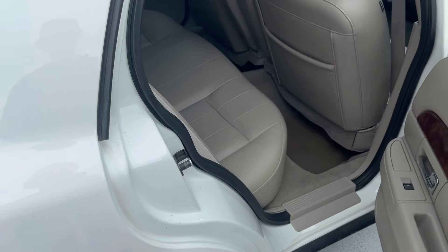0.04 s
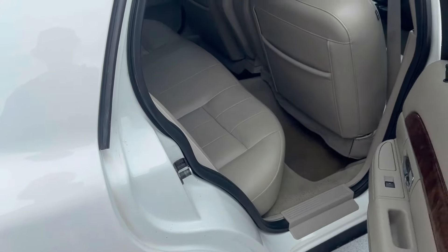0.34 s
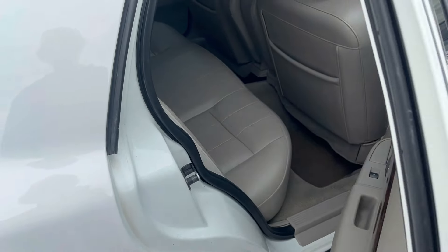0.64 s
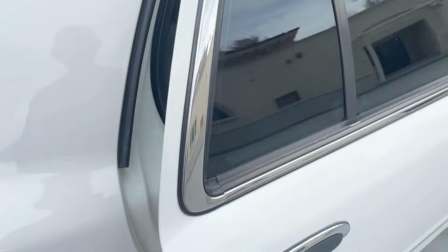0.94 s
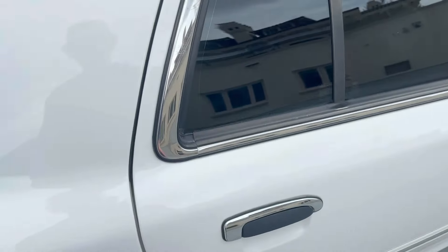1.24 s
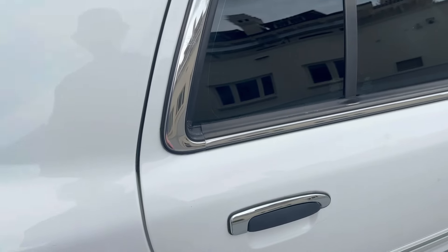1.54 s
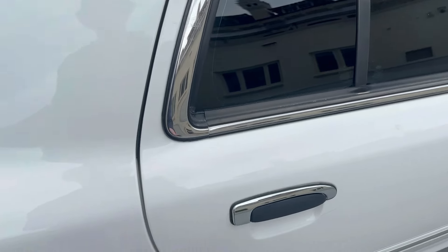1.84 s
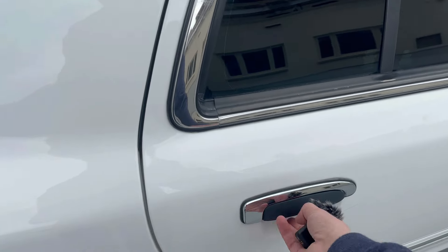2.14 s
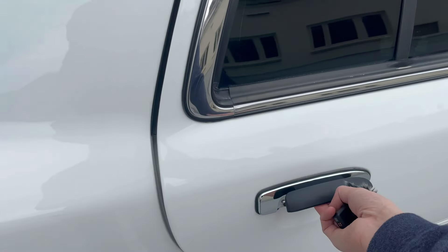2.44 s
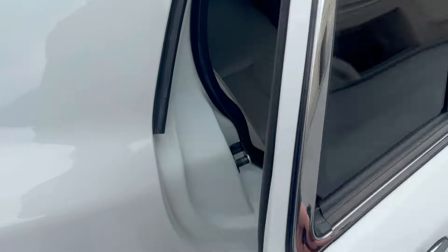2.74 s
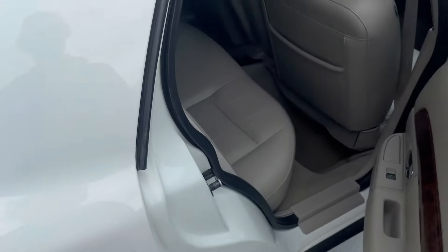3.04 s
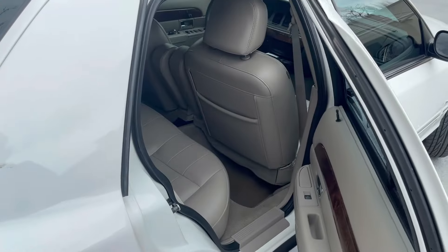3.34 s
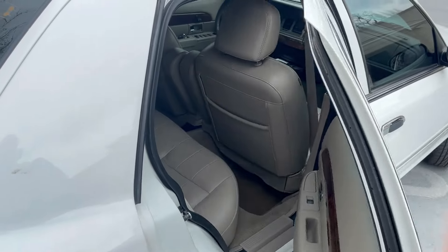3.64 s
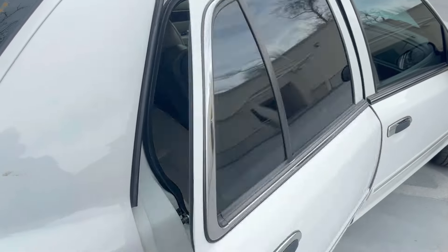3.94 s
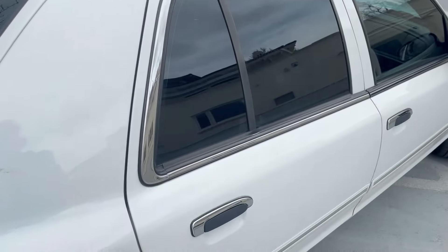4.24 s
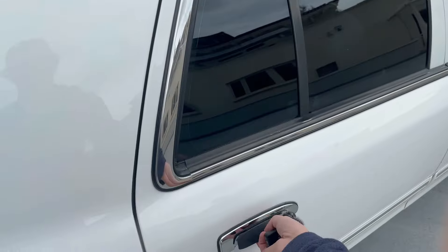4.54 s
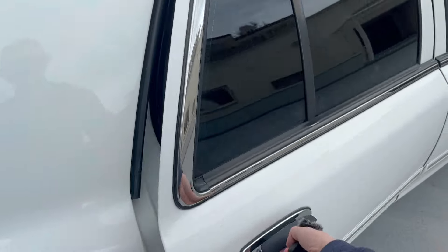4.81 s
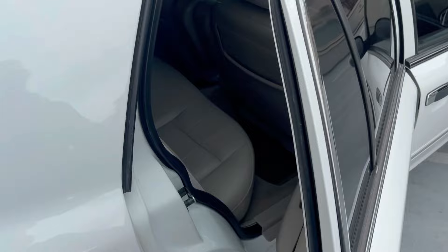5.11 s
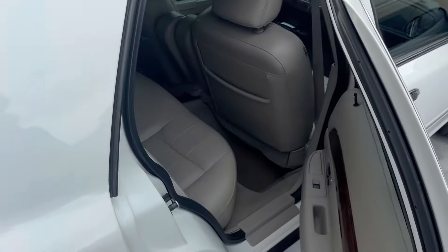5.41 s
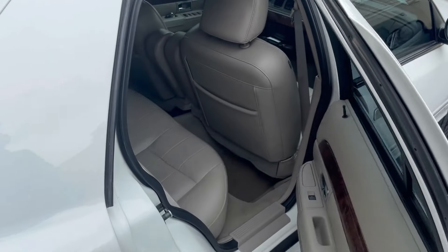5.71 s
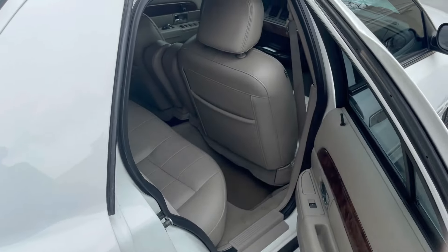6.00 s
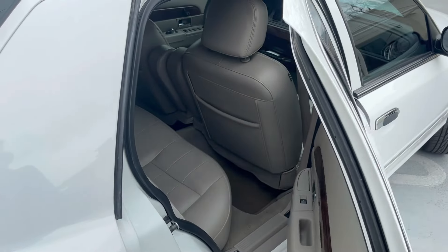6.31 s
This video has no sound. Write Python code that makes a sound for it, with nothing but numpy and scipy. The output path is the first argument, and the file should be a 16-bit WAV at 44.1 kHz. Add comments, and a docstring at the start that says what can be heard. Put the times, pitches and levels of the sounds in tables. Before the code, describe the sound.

Close by in a quiet street, a car door slams shut, clicks open and clunks on its hinge, then does it all again.

```python
"""A parked saloon's heavy rear door, at arm's length in a quiet street. Over far traffic and stirring air,
sleeves rustle and the hand-held microphone is bumped. The dry hinge creaks, then the door slams: a quick
run of latch contacts, a boom of the sealed cabin, a faint echo. The handle clicks, the latch lets go and
the door clunks over its hinge check. It is slammed and opened again, the hinge scratching as it swings."""
import sys
import numpy as np
from scipy import signal
from scipy.io import wavfile
from scipy.ndimage import uniform_filter1d

SR = 44100
rng = np.random.default_rng(int(sys.argv[2]) if len(sys.argv) > 2 else 0)


def wav_record(signal):
    """Record a signal, one row per channel, as 16-bit PCM in the file named by sys.argv[1]."""
    frames = np.transpose(np.atleast_2d(signal))
    bounded = np.clip(frames, -1, 1)
    # unit amplitude maps onto the largest positive 16-bit level
    quanta = np.round(bounded * 32767).astype(np.int16)
    wavfile.write(sys.argv[1], SR, quanta)


N = 289296
TIME = np.arange(N) / SR

# Decay of the shut door. Each row: frequency in Hz, T60 in seconds.
SHUT_RING = [(60, 0.5), (250, 0.37), (700, 0.15), (2000, 0.13), (6000, 0.12), (15000, 0.096)]


def from_db(db):
    """Decibels to gain."""
    return 10 ** (np.asarray(db) / 20)


def at_hz(points, hz):
    """Read a table on a log-frequency axis."""
    freqs_hz, values = np.transpose(points)
    return np.interp(np.log(hz), np.log(freqs_hz), values)


def band_noise(colour, envelope):
    """Half-octave noise bands, each following envelope(hz); rms about 1 at envelope 1."""
    edges_hz = np.geomspace(28, 17000, 20)
    centres_hz = np.sqrt(edges_hz[1:] * edges_hz[:-1])
    gains = from_db(at_hz(colour, centres_hz))
    gains /= np.sqrt(np.sum(gains ** 2 * np.diff(edges_hz)) * 2 / SR)
    white, out = rng.standard_normal((2, N)), np.zeros(N)
    for k, hz in enumerate(centres_hz):
        band = signal.butter(2, edges_hz[k:k + 2], "band", fs=SR, output="sos")
        out += gains[k] * signal.sosfilt(band, white[k % 2] * envelope(hz))
    return out


def swells(movements, rise_share, fall_share, rest_db):
    """Gain over time: each movement speeds up, holds and slows, above a resting level."""
    power = from_db(rest_db) ** 2
    for start_s, length_s, db in movements:
        done = (TIME - start_s) / length_s
        speed = np.clip(np.minimum(done / rise_share, (1 - done) / fall_share), 0, 1)
        power = power + (from_db(db) * speed) ** 2
    return np.sqrt(power)


def grain(spread_db):
    """Gain fluttering every few milliseconds, as rough surfaces catch and slip."""
    flutter = uniform_filter1d(rng.standard_normal(N), size=100)
    return from_db(spread_db * flutter / flutter.std())


def pulses(times_s, sizes):
    """One impulse per contact."""
    out = np.full(N, 1e-18)
    np.add.at(out, np.round(times_s * SR).astype(int), sizes)
    return out


def ring(force, hz, t60_s):
    """One mode: a unit impulse starts a decaying sine of height 1."""
    r, w = from_db(-60 / (t60_s * SR)), 2 * np.pi * hz / SR
    return signal.lfilter([0, r * np.sin(w)], [1, -2 * r * np.cos(w), r * r], force)


def decay(times_s, gains, t60_s):
    """Amplitude envelope: the energy of each hit adds, then leaks away exponentially."""
    retained = from_db(-60 / (t60_s * SR)) ** 2
    energy = signal.lfilter([1], [1, -retained], pulses(times_s, gains ** 2))
    return np.sqrt(energy)


def follow(events, pattern):
    """Each event sets off the same run of contacts; delays and decibels add."""
    return [tuple(np.add(event, step)) for event in events for step in pattern]


def strengths(contacts, hz):
    """Drive of each contact at one frequency: weight adds bass, bare metal adds treble."""
    _, db, bass_db, treble_db = np.transpose(contacts)
    return from_db(db + bass_db / (1 + (hz / 350) ** 4) + treble_db / (1 + (2800 / hz) ** 3))


def clatter(contacts, colour, ring_times, crack_t60_s, crack_db, ring_db, rattle_db):
    """Modes too dense to tell apart: a short crack and a rattling ring."""
    times_s, rattle = np.array(contacts)[:, 0], grain(rattle_db)

    def envelope(hz):
        drive = strengths(contacts, hz)
        crack = from_db(crack_db) * decay(times_s, drive, crack_t60_s)
        tail = from_db(ring_db) * rattle * decay(times_s, drive, at_hz(ring_times, hz))
        return np.hypot(crack, tail)
    return band_noise(colour, envelope)


def panel(contacts, modes, scatter_db):
    """A part's strong modes: low ones start in step as one blunt push, higher ones alternate in sign."""
    times_s, out = np.array(contacts)[:, 0], np.zeros(N)
    scatter = from_db(scatter_db * rng.standard_normal((len(times_s), len(modes))))
    for k, (hz, db, t60_s) in enumerate(modes):
        sign = 1 if hz < 280 else (-1) ** k
        force = pulses(times_s, strengths(contacts, hz) * scatter[:, k])
        out += sign * from_db(db) * ring(force, hz, t60_s)
    # Below its lowest mode a part pushes air aside without radiating.
    lowest_hz = min(mode[0] for mode in modes)
    return signal.sosfilt(signal.butter(4, .7 * lowest_hz, "high", fs=SR, output="sos"), out)


def traffic():
    """Distant traffic: a low, slowly drifting rumble."""
    # Each row: time in seconds, level in dB.
    drift = [(0, -55), (.6, -53), (1.6, -56), (2.5, -54.5), (3.5, -56), (4.5, -55), (5.1, -52), (6.56, -57)]
    # Each row: frequency in Hz, density in dB.
    colour = [(15, -31), (25, -8.5), (70, -8.5), (108, 11), (149, -8.5), (190, 3.5), (270, -6), (344, -5.5),
              (818, -11), (1040, -13), (2410, -24.5), (3820, -45), (11900, -45), (16000, -46.5)]
    gain = from_db(np.interp(TIME, *np.transpose(drift)))
    return band_noise(colour, lambda hz: gain)


def microphone_rumble():
    """Over a light breeze: low rumble as the microphone is moved, then a puff of air after each slam."""
    # Each row: start in seconds, length in seconds, level in dB.
    surges = [(.27, 0.43, -50), (1.27, 0.19, -50.5), (4.28, 0.24, -50.5)]
    # Each row: frequency in Hz, density in dB.
    colour = [(30, -1.5), (80, 0), (160, -9.5), (400, -26.5), (1500, -63), (15000, -90.5)]
    gain = swells(surges, rise_share=0.053, fall_share=0.59, rest_db=-68.5)
    return band_noise(colour, lambda hz: gain)


def handling():
    """Grainy sleeve friction, dry ticks of keys and grit, dull finger bumps on the microphone."""
    # Arm movements. Each row: start in seconds, length in seconds, level in dB.
    strokes = [(.11, 0.065, -67.5), (.34, .13, -71.5), (.92, 0.19, -63), (1.6, .24, -62.5),
               (1.76, .24, -67), (1.93, 0.15, -61.5), (2.02, 0.16, -67.5), (2.25, 0.083, -65),
               (2.28, 0.45, -69), (3.22, 0.11, -70.5), (3.71, 0.083, -64.5), (3.92, 0.12, -60.5),
               (4.41, 0.22, -70.5), (5.73, 0.26, -58.5), (5.93, 0.21, -65)]
    # Each row: frequency in Hz, density in dB.
    sleeve_colour = [(300, -27.5), (1200, -3), (3000, 2.5), (5500, -0.5), (9000, -4.5), (15000, -6.5)]
    # Each row: time in seconds, relative level in dB.
    ticks = [(0.2557, -45.5), (0.3735, -42), (0.419, -42.5), (0.9469, -42), (4.414, -38), (4.7507, -29.5),
             (5.1356, -46.5), (5.429, -42.5), (6.1727, -41), (6.2168, -47)]
    bumps = [(0.289, -35.5), (0.653, -34), (4.003, -37.5), (4.567, -27.5), (5.644, -26), (5.75, -17),
             (5.919, -31)]
    rub = swells(strokes, rise_share=0.357, fall_share=0.35, rest_db=-75) * grain(spread_db=2.2)
    tick_s, tick_db = np.transpose(ticks)
    envelope = rub + decay(tick_s, from_db(tick_db - 7.5), t60_s=0.0074)
    bump_s, bump_db = np.transpose(bumps)
    thuds = ring(pulses(bump_s, from_db(bump_db)), hz=119, t60_s=0.03)
    return band_noise(sleeve_colour, lambda hz: envelope) + thuds


def dry_hinge(creak_step_s=0.0065, creak_loss_db=1.5, swing_s=(4.91, 5.10), slips_per_s=40):
    """The hinge slips: a short creak on the first closing, an uneven scratch on the last swing out."""
    # Each row: start in seconds, then level, bass and treble in dB.
    creak_start = [(.863, -47, 0, -2)]
    # Each row: frequency in Hz, level in dB, T60 in seconds.
    hinge_modes = [(1060, 2, 0.023), (1820, -9, 0.013), (2550, -8, 0.025), (3420, -4, .014)]
    # Each row: frequency in Hz, density in dB.
    slip_colour = [(100, -6), (450, 4.5), (1200, -8), (2500, -10), (4200, 0.5), (6000, 1), (8000, -12),
                   (15000, -9)]
    creak = follow(creak_start, [(k * creak_step_s, -k * creak_loss_db, 0, 0) for k in range(4)])
    slip_s = np.arange(*swing_s, 1 / slips_per_s)
    jitter, size = rng.standard_normal((len(slip_s), 2)).T
    scratch = decay(slip_s + .25 * jitter / slips_per_s, from_db(-59 + 1.5 * size), t60_s=.025)
    return band_noise(slip_colour, lambda hz: scratch) + panel(creak, hinge_modes, scatter_db=5.5)


def slams():
    """The safety catch knocks, the latch crashes home, door and cabin boom."""
    # Each row: time in seconds, then level, bass and treble in dB.
    catches = [(1.1294, -13, -0.5, 0), (4.1366, -9, 0.5, -0.5)]
    shuts = [(1.1490, -10, -1.5, -.5), (4.1520, -9, .5, 0.5)]
    # Each row: offset in seconds, then level, bass and treble in dB.
    pawl_steps = [(0, -2, -12, -3.5), (.0045, 0, -16, 2)]  # pawl hits the catch, drops in behind it
    home_steps = [(-.006, 1.5, -15.5, -6), (-.0027, 2, -10, -0.5), (0, 0, 6.5, 1.5), (0.023, -20, 2, 7.5),
                  (.058, -26, -10, -2)]  # ramp, striker and frame meet; door rebounds, trim rattles
    # Each row: frequency in Hz, density in dB.
    crash_colour = [(60, -15), (200, -5.5), (450, -1.5), (750, -1.5), (1400, -4), (2200, -9.5), (4000, -12),
                    (5500, -17), (7000, -17.5), (10000, -23), (15000, -25.5)]
    # Each row: frequency in Hz, relative level in dB, T60 in seconds.
    catch_modes = [(686, -2, 0.081), (1350, -8, .016), (1860, -12, 0.049), (2380, -12, .035)]
    shut_modes = [(57, -12.5, 0.25), (87.5, -13.5, 0.28), (104, -19.5, 0.3), (126, -17, 0.36),
                  (130.1, -7.5, 0.037), (159.6, -18, 0.26), (186, -19.5, 0.17), (253, -14, 0.18),
                  (282, -21.5, 0.2), (347, -19.5, 0.15), (459, -18, 0.26), (504, -18.5, 0.24),
                  (636, -11, 0.086), (689, -10.5, 0.042), (776, -11, 0.076), (1307, -8, 0.06),
                  (1479, -10, 0.046), (1844, -15, 0.088), (2110, -13, 0.094), (2324, -18.5, 0.12),
                  (2700, -20, 0.077), (3790, -20, 0.056), (6400, -23, 0.067)]  # door, cabin, seal and striker
    home = follow(shuts, home_steps)
    contacts = follow(catches, pawl_steps) + home
    crash = clatter(contacts, crash_colour, SHUT_RING,
                    crack_t60_s=0.02, crack_db=1.5, ring_db=-13.5, rattle_db=2.5)
    boom = from_db(-2) * panel(home, shut_modes, scatter_db=1.5)
    knock = from_db(1) * panel(catches, catch_modes, scatter_db=0.9)
    return crash + boom + knock + street_echo(contacts, echo_db=-34, t60_s=0.52, delay_s=0.059)


def street_echo(contacts, echo_db, t60_s, delay_s):
    """A hard blow scatters back, faint and dull, from the house fronts."""
    # Each row: frequency in Hz, density in dB.
    colour = [(60, -2.5), (200, 10.5), (700, -3), (2000, -9.5), (4000, -22.5), (7000, -41.5),
              (15000, -50.5)]
    arrivals_s = np.array(contacts)[:, 0] + delay_s
    return from_db(echo_db) * band_noise(colour, lambda hz: decay(arrivals_s, strengths(contacts, hz), t60_s))


def latch_and_clicks(roller_step_s=0.0033, roller_loss_db=0.5):
    """Handle, rods and hinge roller click, the door pops off its seal, fingers knock the microphone."""
    # Each row: time in seconds, then level, bass and treble in dB.
    pulls = [(2.3971, -31.5, 0.5, 0.5), (4.6116, -32.5, -1, -2)]
    lone_hits = [(2.5804, -28.5, -57, -3.5), (2.8852, -44, -1, -15), (2.9269, -43.5, 16.5, -15),
                 (2.9396, -43.5, 0, -6), (2.9586, -40.5, 6, -8.5), (3.6011, -55.5, 10, 8.5),
                 (3.655, -49, 1, -4.5), (3.729, -46, -3, -13.5), (3.9190, -44.5, -8, 0),
                 (4.8052, -34.5, -8, 4.5), (5.638, -48.5, 24.5, -0.5), (5.7510, -54.5, 22.5, 11.5),
                 (6.1307, -45.5, 8, -5)]  # hinge ticks, handle springing back, dull finger knocks on the microphone
    # Each row: offset from the pull in seconds, then level, bass and treble in dB.
    linkage_steps = [(-.017, -10.5, 5, -12), (0, -0.5, -19, -10), (0.0172, -3.5, -9, 1.5)]  # slack taken up, lever meets rod, rod lifts pawl
    release_steps = [(0, -6.5, -3, -14), (.0215, -5, 3, 2.5), (.05, -16, 6, -7), (0.0849, 8.5, -.5, -2),
                     (.12, -8, -10, -5), (.146, -5.5, -10, -23)]  # door shifts, latch lets go, seal pushes out
    # Roller grinding up to the detent. Each row: start in seconds, length in seconds, level in dB.
    ramps = [(3.001, .02, -35.5), (5.2298, .012, -31.5)]
    # Each row: frequency in Hz, density in dB.
    pop_colour = [(50, -20), (90, -9.5), (140, -6.5), (220, -8), (470, -5), (750, -10), (1100, -10.5),
                  (2200, -15.5), (5000, -25), (9000, -35), (15000, -38)]
    click_colour = [(100, 0), (400, 6.5), (800, -7), (1500, -4), (3200, -5), (4500, -10), (6000, -6.5),
                    (9000, -18.5), (15000, -19.5)]
    # Each row: frequency in Hz, T60 in seconds.
    click_ring = [(100, 0.059), (1000, 0.047), (4000, 0.062), (15000, 0.048)]
    # Each row: frequency in Hz, relative level in dB, T60 in seconds.
    door_modes = [(93, -12.5, 0.22), (131.5, -2, 0.16), (154, -9, 0.14), (449.7, -20, 0.29),
                  (737, -11, 0.068)]
    rod_modes = [(700, -10.5, 0.072), (1060, -16.5, .06), (1440, -15.5, .05), (2390, -9.5, 0.053),
                 (2640, -14, 0.1), (3120, -12.5, 0.051), (3700, -16, 0.045), (5300, -13.5, 0.02),
                 (6450, -13.5, 0.045)]
    release = follow(pulls, release_steps)
    pop = clatter(release, pop_colour, SHUT_RING,
                  crack_t60_s=0.049, crack_db=-3.5, ring_db=-8, rattle_db=2)
    pop += from_db(4) * panel(release, door_modes, scatter_db=0.5)
    roller = [(start_s + after_s, db - roller_loss_db * k, 0, 0)
              for start_s, length_s, db in ramps
              for k, after_s in enumerate(np.arange(0, length_s, roller_step_s))]
    contacts = follow(pulls, linkage_steps) + roller + lone_hits
    clicks = clatter(contacts, click_colour, click_ring,
                     crack_t60_s=0.028, crack_db=1, ring_db=-5, rattle_db=3)
    return pop + clicks + from_db(-4.5) * panel(contacts, rod_modes, scatter_db=2)


def hinge_check(low_cut_hz=129):
    """The check arm snaps over its detent and rings the free door; no sealed cabin, so no deep bass."""
    # Each row: time in seconds, then level, bass and treble in dB.
    detents = [(3.0272, -1.5, 0.5, -0.5), (5.2460, -1, 0, 2)]
    # Snap and knock back. Each row: offset in seconds, then level, bass and treble in dB.
    snap_steps = [(0, 0.5, 1, 1), (0.013, -9.5, -3, -5)]
    # Each row: frequency in Hz, density in dB.
    clunk_colour = [(40, -37), (100, -18), (200, -5.5), (550, 1.5), (950, -3.5), (1400, -3), (2600, -4),
                    (4500, -14), (7000, -21.5), (10000, -29), (15000, -28.5)]
    # Each row: frequency in Hz, T60 in seconds.
    open_ring = [(60, 0.17), (250, 0.34), (700, 0.21), (1500, 0.084), (4000, 0.059), (15000, 0.046)]
    # Hinge plate, skin and glass. Each row: frequency in Hz, relative level in dB, T60 in seconds.
    open_modes = [(600, 0, .014), (84, -24, .2), (104, -19, .23), (135, -22, .2), (156, -13, .21),
                  (242, -19, .24), (330, -20, .17), (404, -12, .16), (432, -14, .17), (487, -12, .18),
                  (565, -12, .14), (660, -12, .12), (780, -19, .11), (1080, -27, .16), (1250, -18, .1),
                  (1420, -18, .07), (1790, -21, .06), (2365, -16, .06), (2650, -19, .05), (4400, -21, .04),
                  (188, -27, .45), (974, -27.5, .29)]
    contacts, snaps = follow(detents, snap_steps), follow(detents, snap_steps[:1])
    clunk = clatter(contacts, clunk_colour, open_ring,
                    crack_t60_s=0.015, crack_db=0.5, ring_db=-13, rattle_db=1)
    door = from_db(-1) * panel(snaps, open_modes, scatter_db=2.13)
    echo = street_echo(snaps, echo_db=-40, t60_s=0.36, delay_s=0.027)
    return signal.sosfilt(signal.butter(2, low_cut_hz, "high", fs=SR, output="sos"), clunk + door + echo)


def scene():
    """The door, the person at the handle, far traffic and rumble on the microphone, in mono."""
    hits = slams() + hinge_check() + dry_hinge() + latch_and_clicks()
    return (hits + handling() + traffic() + microphone_rumble())[None]


def record(dry):
    """The hardest blows overload the microphone; the top is cut."""
    cutoff_hz = 15900
    clipped = dry / (1 + dry ** 6) ** (1 / 6)
    return signal.sosfilt(signal.ellip(10, .1, 80, cutoff_hz, fs=SR, output="sos"), clipped)


dry = scene()
out = record(dry)
wav_record(out)
```